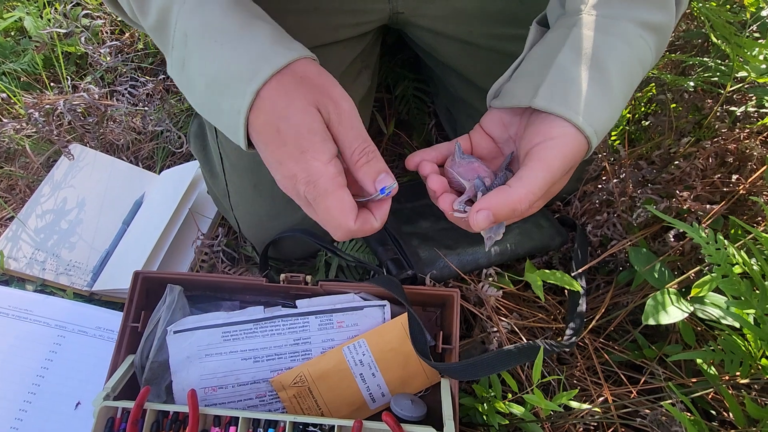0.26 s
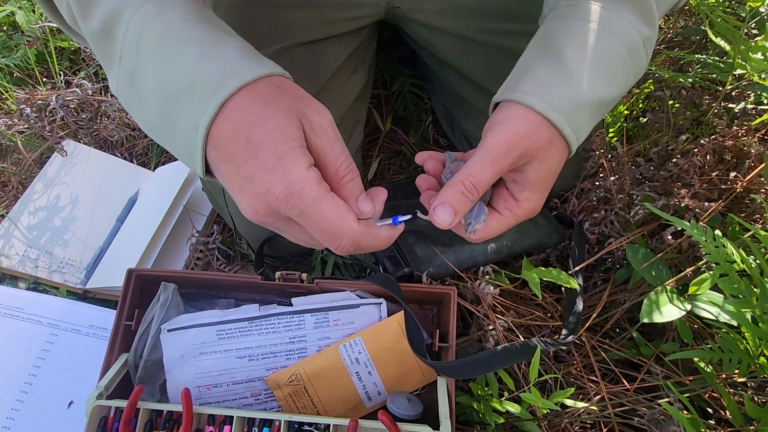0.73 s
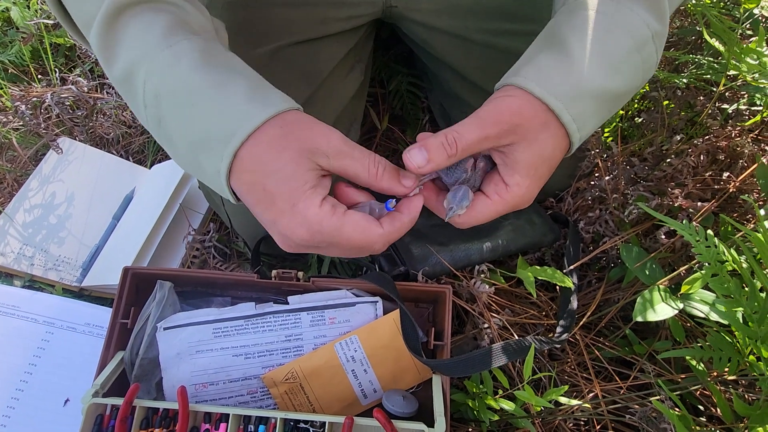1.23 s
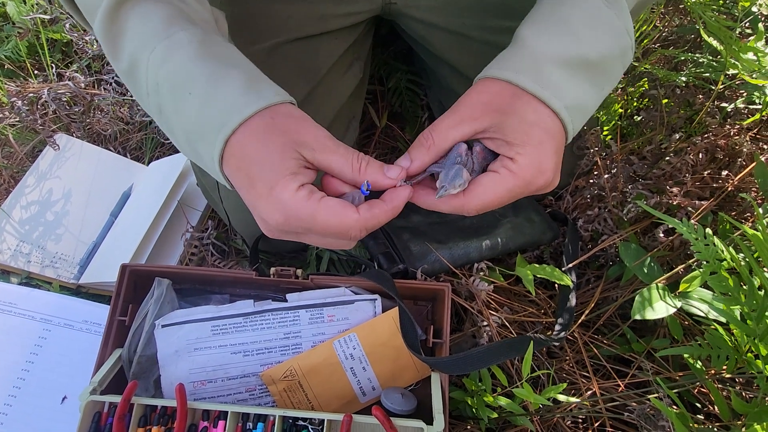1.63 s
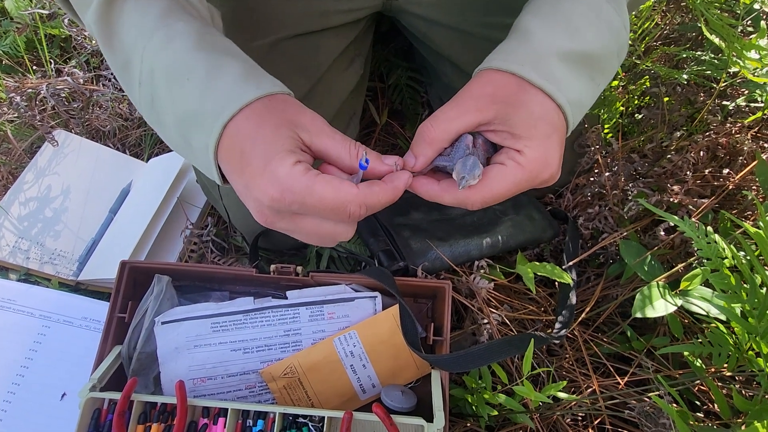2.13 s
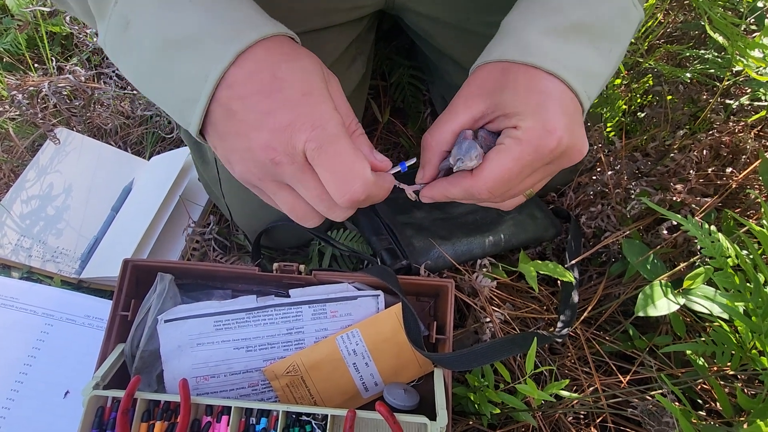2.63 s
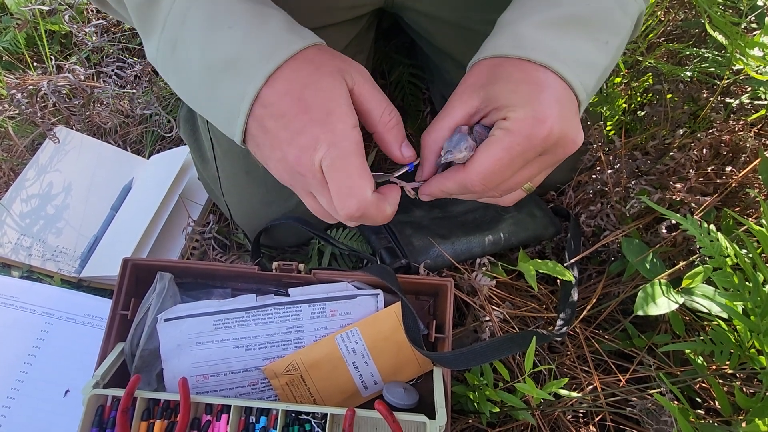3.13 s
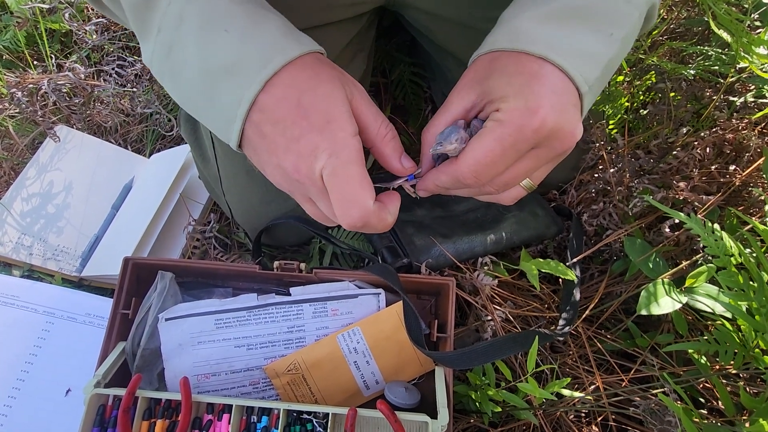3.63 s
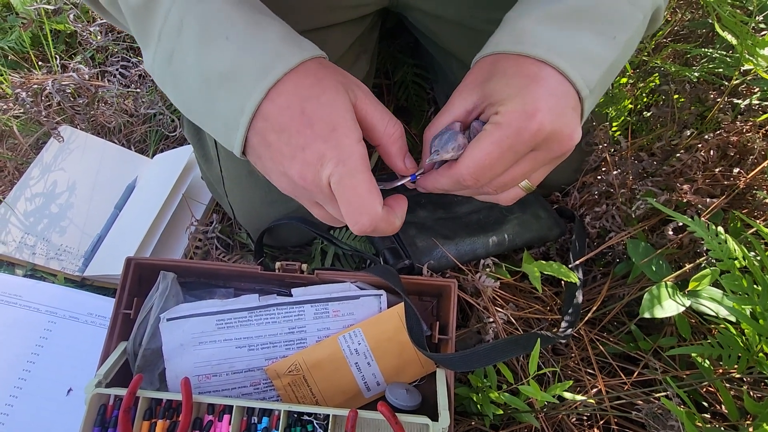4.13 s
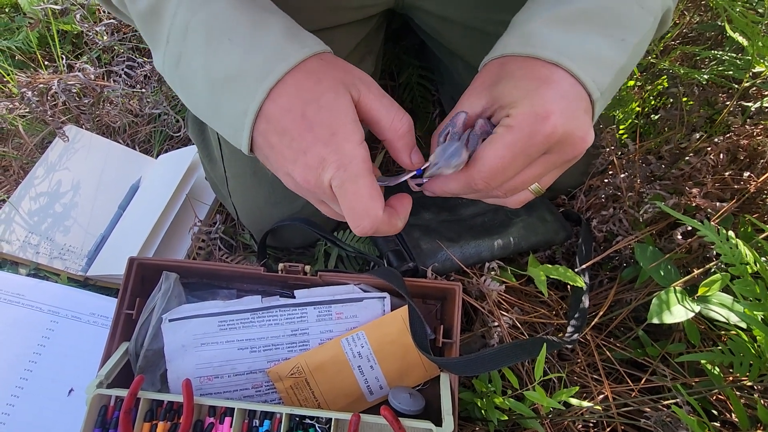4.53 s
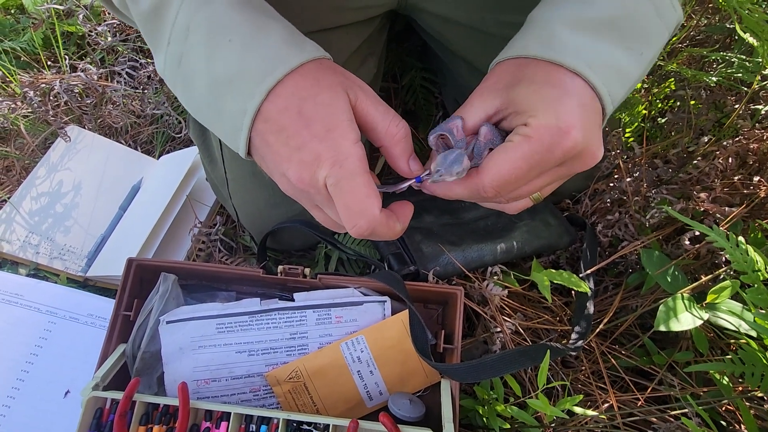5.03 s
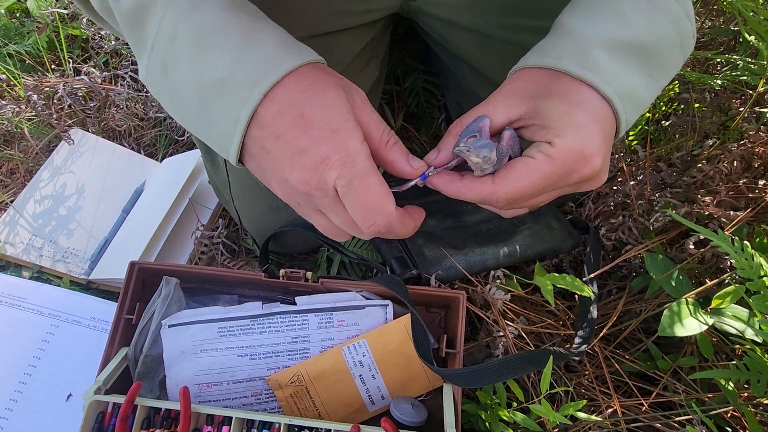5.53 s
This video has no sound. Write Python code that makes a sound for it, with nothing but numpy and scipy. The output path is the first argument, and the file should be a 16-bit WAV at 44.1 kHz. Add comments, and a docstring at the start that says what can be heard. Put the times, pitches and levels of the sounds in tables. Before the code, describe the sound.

Thin, slightly hoarse nestling cries repeat about twice a second above camera-grip rumble, with faint woodland birdsong and a steady pulsing insect buzz behind.

```python
"""Nestling in a pine wood

A woodpecker nestling, held in the hand, whines in thin rising notes that snap downward and sometimes rasp.
Its voice is a gliding tone with pressure-driven overtones, coloured by the throat and the open beak.
Further off, birds chirp, trill, whistle, coo and twitter as pitch contours with scatter from the wood.
Filtered noise makes a pulsing insect drone, a soft hush, and the rumble and brushing of a hand-held camera.
Of its two ports, the left favours the treble and the right the middle."""
import sys
import numpy as np
from scipy import signal
from scipy.fft import rfft, irfft, next_fast_len
from scipy.io import wavfile
from scipy.ndimage import uniform_filter1d

SR = 44100
rng = np.random.default_rng(int(sys.argv[2]) if len(sys.argv) > 2 else 0)


def store_pcm(level_fs):
    """Save levels as 16-bit WAV."""
    pcm = np.round(np.clip(level_fs, -1, 1) * 32767).astype(np.int16)
    wavfile.write(sys.argv[1], SR, np.atleast_2d(pcm).T)


N = 254898
T = np.arange(N) / SR  # s
HZ = np.fft.rfftfreq(2 * N, 1 / SR)

# knocks of the grip on the camera body: (time [s], ring frequency [Hz], level [dB])
GRIP_KNOCKS = [(0.091, 108, -32.5), (0.192, 76.7, -33), (1.545, 152, -38), (1.724, 82.5, -31),
               (2.077, 70, -29.5), (2.995, 88.4, -34.5), (3.375, 108, -30.5), (3.49, 131.7, -38),
               (4.547, 70.3, -27.5), (4.619, 82.3, -28.5), (4.678, 91, -33), (4.786, 83, -26),
               (4.84, 121.6, -33.5), (4.875, 93, -33)]


def undb(db):
    """Level to amplitude: 20 dB is a factor of ten."""
    return 10 ** (np.asarray(db) / 20)


def unit(x):
    """Normalisation to an rms of 1."""
    return x / np.sqrt(np.mean(x ** 2))


def on_log_axis(hz, points, axis=1):
    """Interpolation of a spectrum column on a logarithmic frequency axis."""
    table = np.array(points, float)
    return np.interp(np.log(np.maximum(hz, 1)), np.log(table[:, 0]), table[:, axis])


def shape(x, gain):
    """Linear filtering: the spectrum is multiplied by a gain for every frequency."""
    return irfft(rfft(x, 2 * N) * gain)[..., :N]


def waver(rate):
    """Random modulation of rms 1: noise low-passed by a Gaussian that falls to 1/e at rate [Hz]."""
    return unit(shape(rng.standard_normal(N), np.exp(-(HZ / rate) ** 2)))


def gate(start, end, attack, release):
    """Sine-squared envelope of attack, hold and release, half way up its ramps at start and end."""
    ramp = np.minimum((T - start) / attack, (end - T) / release) + .5
    return np.sin(np.clip(ramp, 0, 1) * np.pi / 2) ** 2


def contour(notes, edge_s):
    """Frequency and amplitude interpolated between points; each note dies away half as fast as it starts."""
    points = np.array([p for note in notes for p in note])
    points = points[np.argsort(points[:, 0])]
    hz = np.interp(T, points[:, 0], points[:, 1])
    db = np.interp(T, points[:, 0], points[:, 2])
    opening = 0
    for note in notes:
        ramp = np.minimum(T - note[0][0], (note[-1][0] - T) / 2) / edge_s + .5
        opening = opening + np.clip(ramp, 0, 1)
    envelope = np.sin(np.minimum(opening, 1) * np.pi / 2) ** 2
    return uniform_filter1d(hz, size=130), undb(db) * envelope


def syrinx(hz, overtones_db):
    """Harmonic series of a vibrating membrane; the fundamental has rms 1."""
    phase = 2 * np.pi * np.cumsum(hz) / SR
    partials = enumerate([0, *overtones_db], 1)
    return np.sqrt(2) * sum(undb(db) * np.sin(k * phase) for k, db in partials)


def arches(table, droop, rough):
    """Frequency and amplitude that rise and fall together with one squeeze of the syrinx."""
    hz, loud, octave_db = np.zeros((3, N))
    for s, length, top_hz, db, bright_db in table:
        u = 2 * (T - s) / length  # -1 to 1 across the chirp
        on = abs(u) < 1
        hz[on] = top_hz * (1 - droop * u[on] ** 2)
        loud[on] = undb(db) * np.cos(u[on] * np.pi / 2)
        octave_db[on] = bright_db
    # the tone is steadiest at the top of the arch and frays on its steep flanks
    flank = np.clip(abs(np.gradient(hz)) * SR / 30000, .3, 1)
    flicker = undb(2.0 * waver(120))
    frayed_hz = hz * (1 + rough * flank * waver(350))
    return loud * flicker * syrinx(frayed_hz, [octave_db, octave_db - 13.5])


def wood(x, wet_db, t60):
    """Direct sound plus decaying diffuse scatter from trunks, independent at each port."""
    t = T[:SR]
    noise = rng.standard_normal((2, SR))
    low = signal.sosfiltfilt(signal.butter(3, 5400, fs=SR, output="sos"), noise)
    decay = 1000 ** (-t / t60)  # 60 dB down after t60 [s]
    # needles soak up the treble, which decays twice as fast
    scatter = (low * decay + (noise - low) * decay ** 2) * (1 - np.exp(-t / 0.0037))
    # the level reference is an envelope that builds up more slowly
    scatter /= np.sqrt(np.sum((decay * (1 - np.exp(-t / 0.032))) ** 2))
    return x + undb(wet_db) * signal.fftconvolve(x[None], scatter, axes=1)[:, :N]


def distant(x, wet_db, t60):
    """Propagation from afar: absorption by foliage, comb filtering by ground and trunk echoes, and scatter."""
    # what the beaks and the foliage let through: (frequency [Hz], gain [dB])
    foliage = [(2000, 4), (5300, 3.5), (6200, -18.5), (7400, -1.5), (8200, -34.5), (9500, -31),
               (12000, -41)]
    lags = rng.uniform(0.000918, 0.01, (5, 2, 1))  # s, five echoes at each port
    echoes = undb(-15) * sum(np.exp(-2j * np.pi * HZ * lag) for lag in lags)
    direct = shape(x, undb(on_log_axis(HZ, foliage)))
    return wood(direct, wet_db, t60) + shape(direct, echoes)


def nestling():
    """Nonlinear voice: pressure and fast glides brighten the overtones; in a rasp the membrane flutters."""
    # hoarse breaks: (time of the peak [s], build-up time [s],
    # level of the breath noise after the beak's colour [dB])
    rasps = [(2.659, .002, -56.5), (2.701, 0.01, -39.5), (3.127, 0.009, -57), (3.262, 0.007, -40.5),
             (4.493, 0.0043, -52)]
    # resonance of the throat and open beak: (frequency [Hz], gain [dB])
    beak = [(500, -25.5), (900, -5), (1500, 0.5), (2000, 7), (2700, -4.5), (3400, 3), (4000, 2),
            (5000, -7.5), (6000, -1.5), (7300, -16.5), (8500, -22), (10000, -38.5), (12000, -24.5)]
    hz, loud, gape_db = cries()
    rasp = 0
    for s, rise, db in rasps:
        rasp = rasp + undb(db) * np.exp(-np.maximum((s - T) / rise, (T - s) / 0.0078))
    chaos = np.minimum(rasp / undb(-39.0), 1)

    # the strain of a rasp also drives the tone louder and drags it down
    loud = loud + undb(-35.0) * chaos ** 2
    hz = hz * (1 - .32 * chaos ** 2)
    # speed of the pitch change, 1 at 30000 Hz/s
    glide = np.clip(uniform_filter1d(abs(np.gradient(hz)), size=260) * SR / 30000, 0, 1)
    push = np.clip((20 * np.log10(loud + 1e-9) + 54) / 14, 0, 1)
    hz = hz * (1 + .003 * waver(150) + 0.053 * chaos * waver(840))

    # the higher the overtone, the more it gains from pressure; each flickers on its own
    overtones = []
    for k, db in enumerate((-20.5, -28, -42.0, -45.0), 2):
        pressure_db = (3.63 * k + 8 * glide) * push
        overtones.append(db + gape_db + pressure_db + on_log_axis(k * hz, beak) + 2 * waver(60))
    tone = loud * undb(1.5 * waver(100)) * syrinx(hz, overtones)

    # air escapes in uneven spurts through the fluttering membrane
    spurts = rng.standard_normal(N) * undb(3.5 * waver(500))
    breath_gain = undb(on_log_axis(HZ, beak)) / np.hypot(1, HZ / 3800)
    noise = rasp * unit(shape(spurts, breath_gain))
    return wood(tone + noise, wet_db=-26.5, t60=0.2)


def cries():
    """Frequency and amplitude modulation: a cry scoops up, climbs and snaps down; the voice comes and goes."""
    # cries, each one arch of pitch: (start [s], snap time [s], early pitch [Hz], late pitch [Hz],
    # scoop time constant [s], level of the snap's burst [dB], gain of the overtones from the gape [dB])
    cry_arcs = [ (.78, .895, 1524, 1690, .02, -69, -6), (1.352, 1.587, 1513, 1946, .052, -38.5, -3.5),
                (1.875, 2.155, 1659, 1950, 0.024, -58, -0.5), (2.432, 2.714, 1773, 1957, 0.016, -53, -1.5),
                (2.982, 3.273, 1782, 1980, .01, -52, 0), (3.556, 3.837, 1770, 2018, .013, -43.5, 0),
                (4.093, 4.495, 1903, 2178, .013, -38, -6), (4.848, 5.069, 1444, 1842, .005, -67, 2.5),
                (5.408, 5.664, 1536, 1868, 0.012, -46.5, 0)]
    # stretches in which the voice catches: (start [s], length [s], opening level [dB],
    # closing level [dB], sag of the pitch at the close [share])
    voiced_notes = [ (.805, 0.028, -48.5, -55, 0), (0.846, .02, -45, -58.5, 0),
                    (1.354, 0.049, -63, -55.5, 0), (1.487, 0.064, -53, -49.5, 0),
                    (1.876, 0.072, -58, -56.5, 0), (2.018, 0.038, -47.5, -52.5, .02),
                    (2.058, 0.033, -48, -49, 0), (2.111, 0.039, -47, -42, .07), (2.43, 0.038, -55, -65, 0),
                    (2.467, .188, -51.5, -46, 0), (2.656, 0.051, -60, -48.5, 0),
                    (2.98, 0.054, -60, -52.5, .02), (3.128, 0.046, -53.5, -46, .02),
                    (3.204, 0.059, -45, -45.5, 0), (3.558, 0.013, -50, -54, 0),
                    (3.666, .055, -50, -50, .01), (3.777, 0.0571, -52, -42.5, .05),
                    (4.09, 0.042, -51, -55.5, .02), (4.236, 0.072, -49, -47, .06),
                    (4.336, 0.045, -44, -57.5, .1), (4.85, 0.049, -50.5, -57.5, .09),
                    (4.896, 0.164, -56, -45.5, .025), (5.407, 0.26, -59.5, -44, 0)]
    scoop_share, drop_share = 0.28, .25  # pitch missing at the start of a cry and after its snap
    fall_s = .0052  # before the snap time, when half the drop is done
    burst_s, lead_s = 0.0033, 0.0011  # the burst of level peaks just before the bottom
    overshoot, settle_s = .027, .009  # a note is sharp by this share around its start, then settles
    attack_s, release_s, sag_s = .005, .011, .014

    hz, loud, gape_db = np.full(N, float(cry_arcs[0][2])), np.zeros(N), np.zeros(N)
    for start, end, early_hz, late_hz, scoop_s, snap_db, bright_db in cry_arcs:
        on = T >= start
        climb = np.interp(T[on], [start, end], [early_hz, late_hz])
        scoop = 1 - scoop_share * np.exp((start - T[on]) / scoop_s)
        fall = 1 - drop_share / (1 + (np.maximum(end - T[on], 0) / fall_s) ** 2)
        hz[on] = climb * scoop * fall
        gape_db[on] = bright_db
        loud += undb(snap_db) * np.exp(-((T - end + lead_s) / burst_s) ** 2)
    for s, length, open_db, close_db, sag in voiced_notes:
        voiced = gate(s, s + length, attack_s, release_s)
        loud += voiced * undb(np.interp(T, [s, s + length], [open_db, close_db]))
        sharpening = overshoot * np.exp(-abs(T - s) / settle_s)
        sagging = sag * np.exp(-abs(T - s - length) / sag_s)
        hz *= 1 + sharpening - sagging
    return uniform_filter1d(hz, size=130), loud, gape_db


def whines():
    """Weak, wavering tones of a barely open beak, which passes little of the second harmonic."""
    # soft whines between the notes, each a list of points: (time [s], pitch [Hz], level [dB])
    whine_points = [
        [(2.16, 1720, -75), (2.27, 1706, -64.5), (2.46, 1854, -66)],
        [(3.58, 1760, -58), (3.66, 1830, -68.5), (3.76, 1945, -60.5)],
        [(4.61, 1760, -65), (4.69, 1795, -73.5), (4.74, 1733, -67), (4.81, 1870, -68), (4.95, 1925, -73)],
    ]
    hz, loud = contour(whine_points, edge_s=0.055)
    flicker = undb(1.2 * waver(30))
    tone = syrinx(hz * (1 + 0.0035 * waver(75)), [-20])
    return wood(loud * flicker * tone, wet_db=-17, t60=0.27)


def far_birds():
    """Chirps, trill, whistle and coos, each with its own ratio of scattered to direct sound."""
    # a second bird's arched chirps, before the foliage: (time of the top [s], length [s],
    # top pitch [Hz], level [dB], level of the octave relative to the fundamental [dB])
    chirp_arches = [(1.273, 0.051, 2677, -58.5, -3), (2.133, 0.071, 3393, -50.5, -8.5),
                    (3.068, 0.074, 3424, -48.5, -1), (4.181, 0.08, 2918, -57.5, -1.5),
                    (4.985, .062, 2693, -59, 0.5), (5.58, 0.054, 2760, -74.5, -15),
                    (5.778, 0.064, 2800, -57.5, 2)]
    # a long slurred whistle, lists of points: (time [s], pitch [Hz], level [dB])
    whistle_points = [
        [(.4, 3450, -78), (.425, 4060, -60.5), (.455, 4510, -63), (.485, 4580, -50.5), (.505, 4150, -57),
         (.52, 3400, -67)],
        [(.68, 4420, -53.5), (.715, 3740, -64), (.76, 3530, -62), (.83, 3465, -63.5), (.95, 3603, -63.5),
         (1.1, 3736, -64), (1.25, 3886, -65), (1.34, 4020, -64)],
    ]
    # faint low coos, lists of points: (time [s], pitch [Hz], level [dB])
    coo_points = [
        [(3.93, 487, -78.5), (4.08, 496, -72), (4.22, 491, -71)],
        [(5.04, 490, -71), (5.18, 494.6, -77.5), (5.32, 490, -71)],
    ]
    chirps = arches(chirp_arches, droop=.28, rough=.017)
    trill = arches(trill_notes(), droop=.22, rough=.08)
    hz, loud = contour(whistle_points, edge_s=0.018)
    whistle = loud * undb(2.4 * waver(44)) * syrinx(hz * (1 + 0.0035 * waver(120)), [])
    hz, loud = contour(coo_points, edge_s=.04)
    coos = loud * undb(3.7 * waver(25)) * syrinx(hz * (1 + 0.011 * waver(60)), [])
    arched = distant(chirps, wet_db=-13, t60=.7) + distant(trill, wet_db=-6, t60=.35)
    return arched + wood(whistle, wet_db=-6.5, t60=1.0) + wood(coos, wet_db=-10, t60=0.69)


def trill_notes(count=13):
    """A quickening pulse train of arched chirps; pitch and level follow one swell of effort."""
    start_s, period_s, quicken_s = .071, .0905, .00095  # each period is shorter than the last by quicken_s
    low_hz, rise_hz = 2532, 316
    base_db, swell_db, scatter_db = -67, 2.5, 1.8  # before the foliage; scatter from note to note
    note_s, note_octave_db = (.05, .033), (-1, 8)  # (first note, last note): they shorten and brighten
    u = np.linspace(0, 1, count)
    periods = period_s - quicken_s * np.arange(count - 1)
    times = start_s + np.append(0, np.cumsum(periods))
    effort = np.sin(np.pi * u) ** 2
    db = base_db + swell_db * effort + scatter_db * rng.standard_normal(count)
    length = np.interp(u, [0, 1], note_s)
    octave_db = np.interp(u, [0, 1], note_octave_db)
    return zip(times, length, low_hz + rise_hz * effort, db, octave_db)


def songbird():
    """Down-slurred pure tones deep in the wood, where scattered sound outweighs direct sound."""
    # notes of the song: (start [s], end pitch [Hz], level before the final trim [dB])
    song_notes = [(.92, 6450, -76.5), (1.16, 6330, -72), (1.275, 3916, -59), (1.33, 3496, -66.5),
                  (1.405, 5520, -71.5), (1.52, 3900, -59.5), (1.6, 3527, -59), (1.63, 5460, -68),
                  (1.755, 6030, -71.5), (1.81, 4336, -61.5), (1.985, 5620, -69.5), (2.085, 6110, -67),
                  (2.325, 3800, -63.5), (2.525, 4020, -64)]
    note_s, slur = .085, 0.083  # each note starts higher by this share of its pitch, then levels out
    hz, loud = np.zeros(N), np.zeros(N)
    for s, end_hz, db in song_notes:
        u = (T - s) / note_s
        on = (u > 0) & (u < 1)
        hz[on] = end_hz * (1 + slur * (1 - u[on]) ** 2)
        loud[on] = undb(db) * np.sin(np.pi * u[on])
    tone = syrinx(hz * (1 + .012 * waver(250)), [])
    return wood(loud * tone, wet_db=1.0, t60=0.81) * undb(-1)


def twitter(count=30):
    """Faint peeps of small birds far back, at random times, pitches and levels."""
    peeps = []
    for when, pitch, size in rng.random((count, 3)):
        # top time [s], length [s], top pitch [Hz], level before the foliage [dB], octave [dB]
        peeps.append((2.2 + 1.6 * when, .03, 2200 + 800 * pitch, -75 + 6 * size, -14))
    return distant(arches(peeps, droop=.25, rough=.015), wet_db=-7, t60=.4)


def insects(pulse_hz=49.25, sag_hz=260):
    """Resonant noise bands; the nearest insect is amplitude-modulated and its pitch sags in each pulse."""
    # bands of the chorus: (centre [Hz], width scale [Hz], level [dB], power that pulses [share, 0-1])
    chorus_bands = [(4882, 370, -63.5, 0.37), (4480, 424, -70, 0.1), (5250, 410, -76.5, 0.8),
                    (5887, 53, -81.5, 0.11)]
    cycle = np.cumsum(pulse_hz * (1 + 0.027 * waver(7.1))) / SR % 1
    # a frequency shift from +sag_hz to -sag_hz over each pulse
    sag = np.exp(2j * np.pi * np.cumsum(sag_hz * (1 - 2 * cycle)) / SR)
    pulse = np.sin(np.pi * cycle) ** 2
    out = 0
    for hz, width, db, depth in chorus_bands:
        ring = (1 + ((HZ - hz) / width) ** 2 / 4) ** -4
        chorus = unit(shape(rng.standard_normal((2, N)), ring))
        nearest = unit(shape(rng.standard_normal((2, N)), ring))
        analytic = signal.hilbert(nearest, next_fast_len(N))[:, :N]
        pulsed = unit((analytic * sag).real * pulse)
        share = np.clip(depth, 0, 1)
        mix = np.sqrt(1 - share) * chorus + np.sqrt(share) * pulsed
        out = out + undb(db + .5 * waver(19)) * mix
    return out


def handling():
    """Structure-borne noise: the grip rumbles through the camera body, knocks it into a few cycles and scuffs."""
    # colour of the body's rumble: (frequency [Hz], gain [dB])
    body = [(15, -5.5), (28, 0.5), (42, 4.5), (85, 2.5), (120, -4.5), (170, -13), (250, -32.5),
            (400, -39.5), (1000, -83)]
    rumble = unit(shape(rng.standard_normal(N), undb(on_log_axis(HZ, body))))
    rumble /= np.sqrt(uniform_filter1d(rumble ** 2, size=4000))  # even out the level
    grip_db = grip()
    # the deepest sway rises with the grip up to a ceiling, while the shudder goes on growing
    sway = shape(rumble, 1 / (1 + (HZ / 48) ** 6))
    sway_db = np.minimum(grip_db + 1.5, -37)
    rumble = undb(grip_db) * (rumble - sway) + undb(sway_db) * sway
    scuff = unit(shape(rng.standard_normal(N), 1 / (1 + ((HZ - 160) / 90) ** 2) ** 2))
    knocks = 0
    for s, hz, db in GRIP_KNOCKS:
        # a knock that rings higher scuffs more
        ring = np.sin(2 * np.pi * hz * (T - s)) + undb(-17.0) * (hz / 100) ** 2 * scuff
        knocks = knocks + undb(db) * np.exp(-((T - s) / 0.013) ** 2) * ring
    return rumble + knocks


def grip():
    """Level [dB] of the rumble: slow modulation, a swell around each knock, a raised level as the hold shifts."""
    # the hands shift their hold: (start [s], end [s], rise of the grip level [dB])
    hold_shifts = [(.04, .23, 3.5), (1.53, 1.78, 4), (2.415, 2.75, 3), (2.954, 3.498, 2),
                   (4.462, 4.926, 11)]
    rest_db, wander_db, swell_db = -46, 1.95, 4.5
    swell_s, shift_edge_s = 0.024, .04
    jolts = sum(np.exp(-((T - s) / swell_s) ** 2) for s, _, _ in GRIP_KNOCKS)
    shifts_db = sum(db * gate(start, end, shift_edge_s, shift_edge_s) for start, end, db in hold_shifts)
    return rest_db + wander_db * waver(17) + swell_db * jolts + shifts_db


def brushes():
    """Stick-slip friction: skin and cloth catch and slip in tiny grains of noise."""
    # fingers and sleeve brushing: (time of the peak [s], time to fall to 1/e [s], level [dB])
    strokes = [(0.045, 0.032, -59.5), (0.12, 0.065, -71), (0.184, 0.007, -59), (0.218, 0.1, -66.5),
               (0.313, .008, -61.5), (1.189, 0.025, -66.5), (2.96, 0.0076, -81), (3.428, 0.016, -63),
               (3.517, 0.0085, -60.5)]
    # colour of skin on cloth: (frequency [Hz], gain [dB])
    cloth = [(200, -14.5), (350, 12), (700, -5.5), (1300, 7.5), (2100, 2.5), (3500, -17), (6000, -33),
             (9000, -40)]
    touch = sum(undb(db) * np.exp(-((T - s) / length) ** 2) for s, length, db in strokes)
    grains = rng.standard_normal(N) * undb(3.1 * waver(150))
    return touch * unit(shape(grains, undb(on_log_axis(HZ, cloth))))


def air():
    """Diffuse noise, independent at the two ports: a soft hush that swells a little."""
    # air of the wood and microphone hiss: (frequency [Hz], spectral density [dB per Hz])
    air_density = [(30, -78.5), (120, -87), (250, -89.5), (320, -100), (410, -91), (560, -102),
                   (1000, -108), (1550, -103), (2500, -104), (3300, -113), (5600, -114), (6600, -129),
                   (9300, -144), (12000, -125), (15500, -125)]
    gain = undb(on_log_axis(HZ, air_density)) * np.sqrt(SR / 2)
    return shape(rng.standard_normal((2, N)), gain) * undb(.8 * waver(12))


def scene():
    """Superposition of everything that reaches the two ports."""
    birds = nestling() + whines() + far_birds() + songbird() + twitter()
    return birds + insects() + air() + handling() + brushes()


def record(dry):
    """Frequency-dependent level and phase differences between the ports, then a steep low-pass."""
    # the two ports: (frequency [Hz], left minus right level [dB], phase lead of the left [rad])
    port_response = [(30.2, -2, 0.57), (128, -4.5, 0.31), (297, -8, 1), (600, -8.5, -1.3), (1000, -8.5, 1),
                     (1550, -15.5, 5), (1740, -6.5, 2.5), (1890, -12, 4), (2736, -1.5, 8.5),
                     (3343, 4.5, 7.5), (3350, 9, 8), (4080, 12, 7.5), (5200, 17.5, 9.5), (9300, 11.5, 24.5)]
    tilt = undb(on_log_axis(HZ, port_response, axis=1))
    lead = on_log_axis(HZ, port_response, axis=2)
    ports = np.array([tilt * np.exp(1j * lead), np.ones(len(HZ))])
    ports = ports * np.sqrt(2 / (1 + tilt ** 2))  # the summed power gain stays 2 at every frequency
    low_pass = signal.ellip(10, .2, 80, 15700, fs=SR, output="sos")
    return signal.sosfilt(low_pass, shape(dry, ports))


dry = scene()
out = record(dry)
store_pcm(out)
```